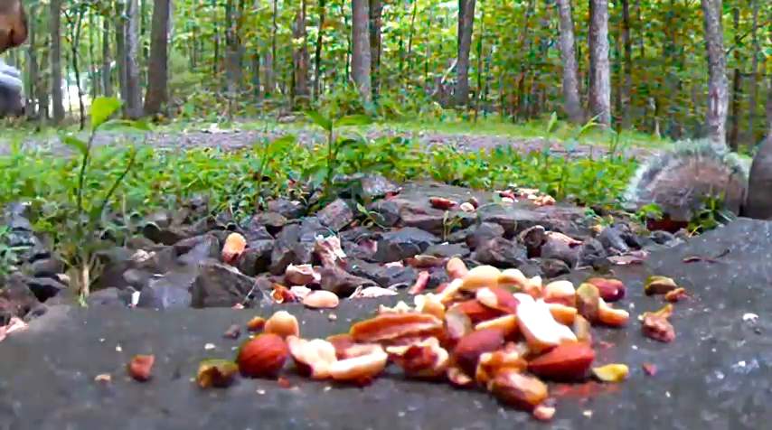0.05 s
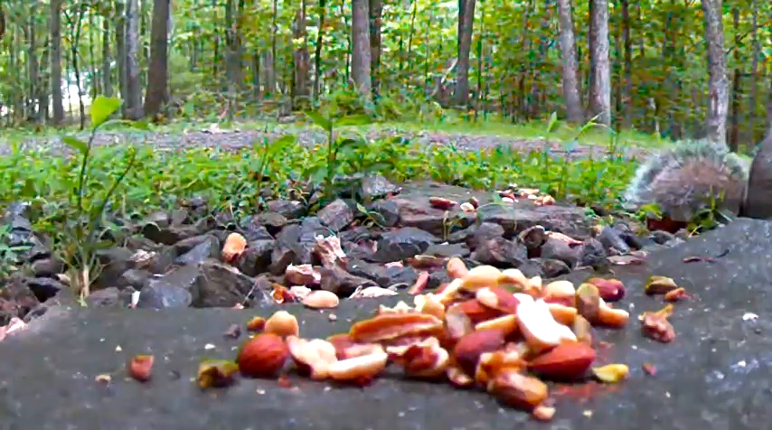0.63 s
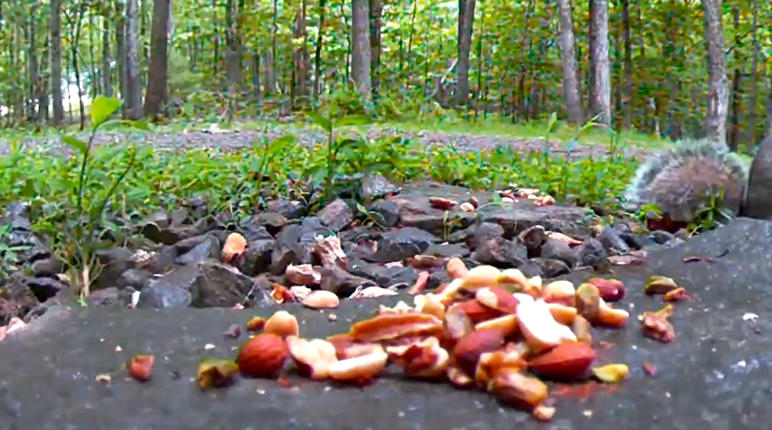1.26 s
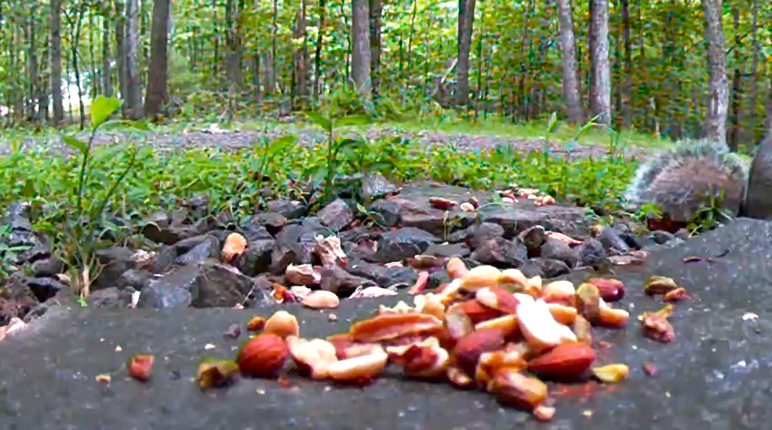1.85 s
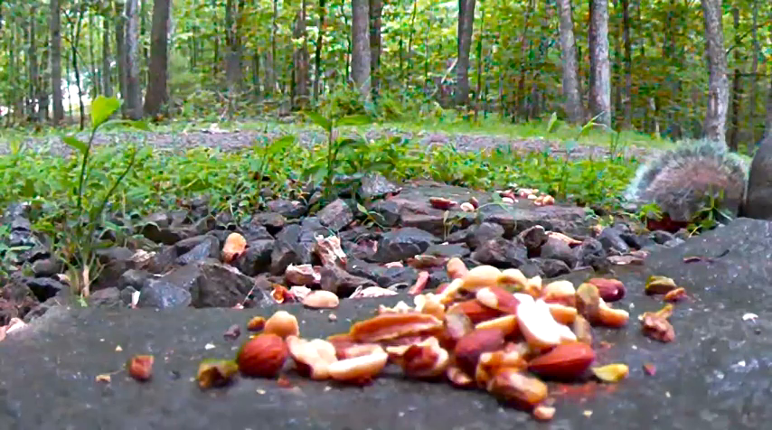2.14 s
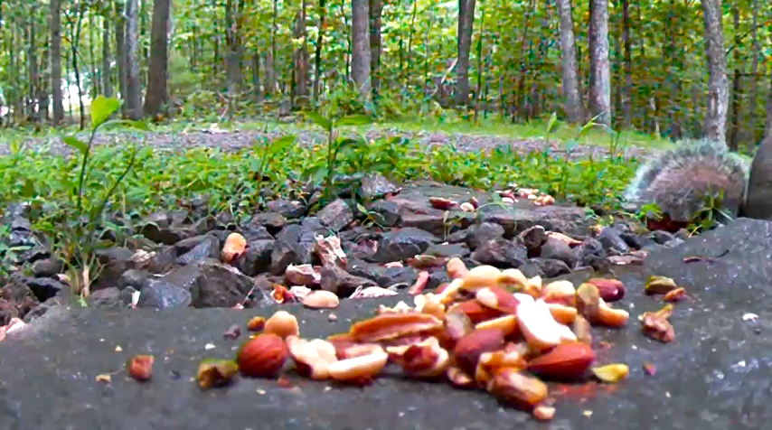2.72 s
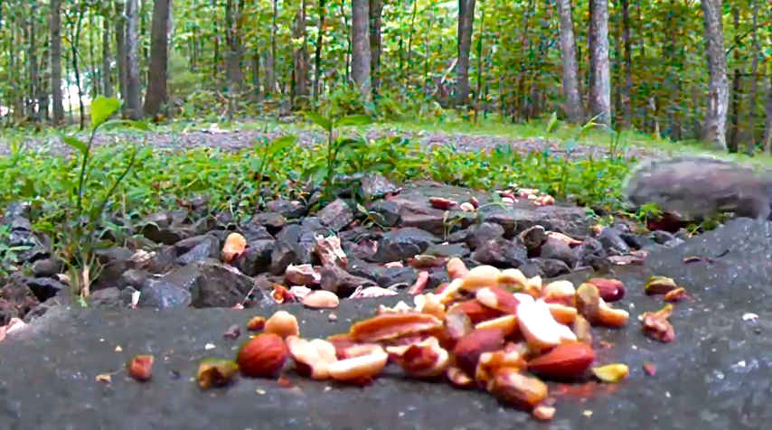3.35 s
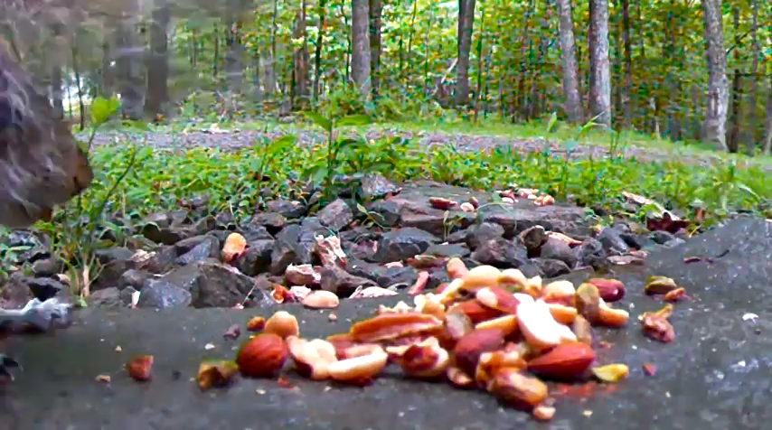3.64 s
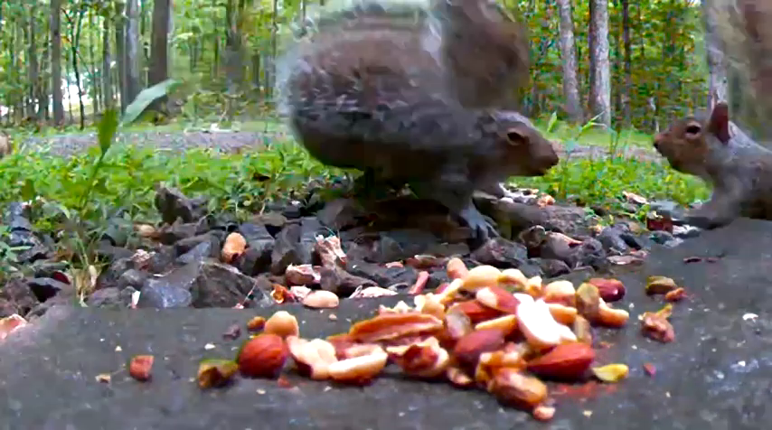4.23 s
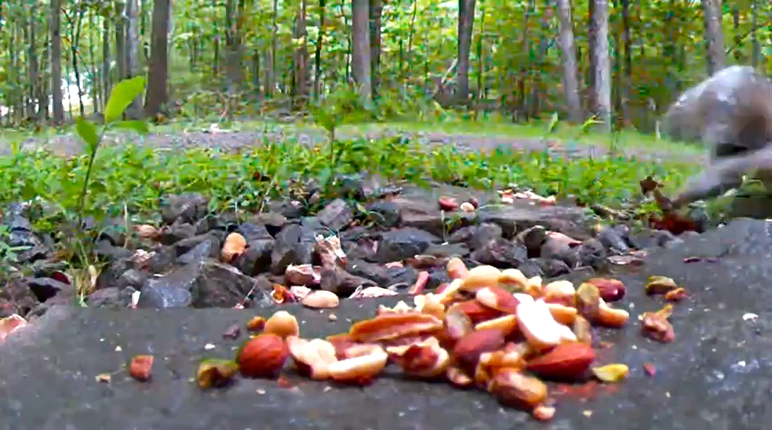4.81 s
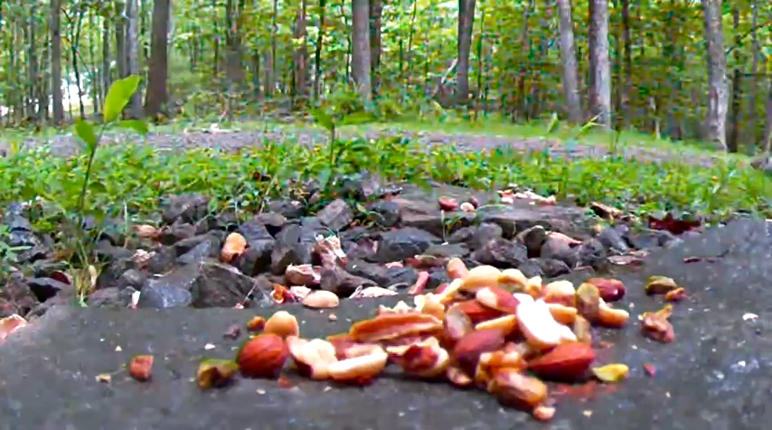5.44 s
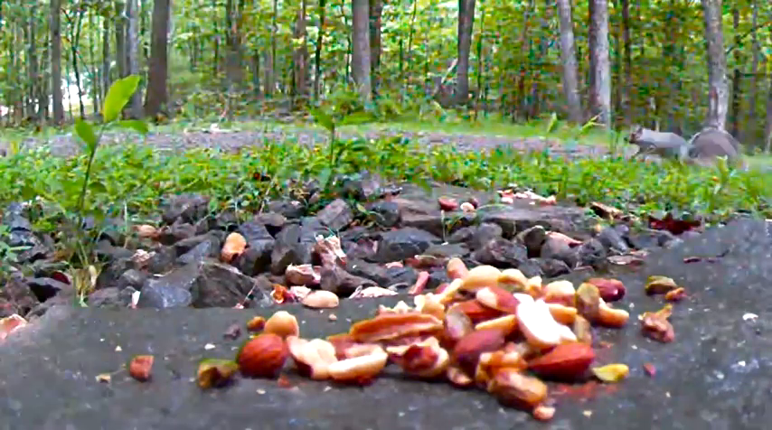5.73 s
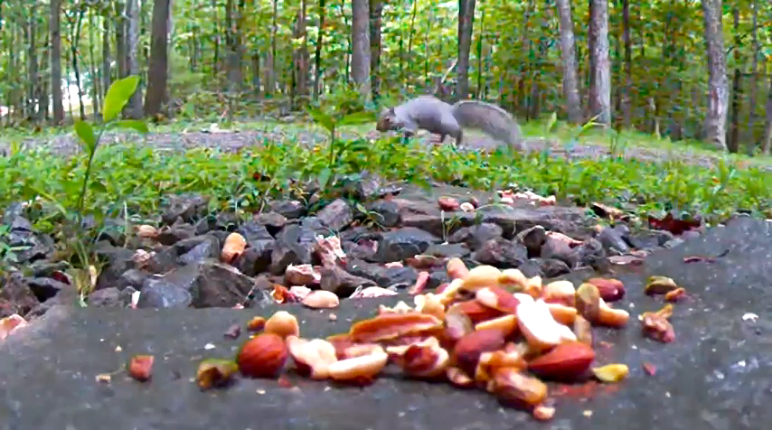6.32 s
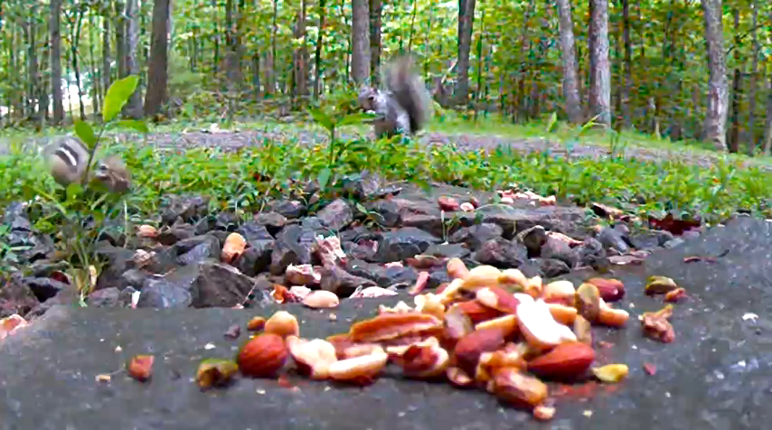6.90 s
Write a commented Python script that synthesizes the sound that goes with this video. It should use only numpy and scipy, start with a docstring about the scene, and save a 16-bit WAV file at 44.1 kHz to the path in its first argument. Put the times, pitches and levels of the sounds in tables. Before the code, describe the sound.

In a quiet wood with barely audible insects, birds and a far engine drone, a squirrel nibbles nuts on a rock right beside the microphone. Crisp little snaps mix with brief raspy whines and tiny squeaks. About halfway through comes a louder two-second scramble of claw clicks, crackling leaves and soft, low paw thuds, which trails off into a few faint ticks.

```python
"""Sharp little cracks and scrapes over quiet forest air: a squirrel is opening peanuts on a flat rock.
Its incisors snap the nuts and stick and slip on the kernels; between bites it whines and hisses at a rival.
Then it dashes off: claws click on loose stones, dry leaves rustle, paws thump the rock and set it ringing.
Behind it are a far engine hum, a thin band of insects and a few faint bird notes smeared by the trees.
All is heard through the housing of a small camera right beside the rock."""
import sys
import numpy as np
from scipy import signal
from scipy.fft import rfft, irfft, next_fast_len
from scipy.io import wavfile
from scipy.ndimage import uniform_filter1d

SR = 44100
rng = np.random.default_rng(int(sys.argv[2]) if len(sys.argv) > 2 else 0)


def materialize(psi):
    """Save the field psi as 16-bit PCM at rate SR to the path in sys.argv[1].

    A 1-D psi becomes a single channel; in a 2-D psi each row is a channel.
    """
    bounded = np.clip(np.atleast_2d(psi).T, -1, 1)
    quanta = np.round(bounded * 32767).astype(np.int16)
    wavfile.write(sys.argv[1], SR, quanta)


N = 307377
TIME = np.arange(N) / SR


def gain_of(db):
    """Decibels to amplitude."""
    return 10 ** (np.asarray(db) / 20)


def unit_rms(x):
    """Scales to rms 1."""
    return x / np.sqrt(np.mean(x ** 2) + 1e-20)


def eq_gain(curve, hz):
    """Amplitude of an EQ curve at hz, read on a log-frequency axis."""
    points_hz, db = np.transpose(curve)
    return gain_of(np.interp(np.log(hz + 1), np.log(points_hz + 1), db))


def eq(x, curve):
    """Filters x by a curve of (frequency [Hz], gain [dB])."""
    size = next_fast_len(len(x) + 2048)
    return irfft(rfft(x, size) * eq_gain(curve, np.fft.rfftfreq(size, 1 / SR)), size)[:len(x)]


def noise(curve):
    """Scene-long noise of rms 1, coloured by an EQ curve."""
    return unit_rms(eq(rng.standard_normal(N), curve))


def automation(rows):
    """Draws each column of timed breakpoints as a scene-long curve."""
    times, *columns = np.transpose(rows)
    return [np.interp(TIME, times, column) for column in columns]


def add(mix, start_s, sound):
    """Mixes a sound in at start_s."""
    part = mix[max(round(start_s * SR), 0):][:len(sound)]
    part += sound[:len(part)]


def wander(count, rate_hz):
    """Smooth random drift, roughly of size 1."""
    knots = np.arange(count) * rate_hz / SR
    return np.interp(knots, np.arange(4096), rng.standard_normal(4096))


def whistles(rows, blur, blur_hz):
    """Thin gliding notes that waver in strength and phase."""
    out = np.zeros(N)
    for start, length, start_hz, end_hz, db in rows:
        count = int(length * SR)
        phase = 2 * np.pi * np.cumsum(np.linspace(start_hz, end_hz, count)) / SR
        waver = wander(count, blur_hz) * np.sin(phase) + wander(count, blur_hz) * np.cos(phase)
        note = unit_rms(np.sin(phase) + blur * waver)
        add(out, start, gain_of(db) * note * signal.windows.tukey(count, .4))
    return out


def snap(hz, octaves, splinter_ms, low_cut_hz=1500, skirt=1.52, size=1024):
    """A brittle break and its tiny after-cracks ring a small, well damped body; energy 1."""
    t = np.arange(size) / SR
    freqs = np.fft.rfftfreq(size, 1 / SR) + 1
    splinters = rng.standard_normal(size) * np.exp(-t * 1e3 / max(splinter_ms, .05))
    force = 2 * splinter_ms * splinters / np.linalg.norm(splinters)
    force[0] += 1  # the break itself
    detune = np.log2(freqs / hz) / max(octaves, .1)
    log_body = -skirt * np.log(1 + detune ** 2 / skirt) - .5 * np.log(1 + (low_cut_hz / freqs) ** 4)
    cepstrum = irfft(np.maximum(log_body, log_body.max() - np.log(1000)))
    cepstrum[1:size // 2] *= 2  # minimum phase: the ring follows the break
    cepstrum[size // 2 + 1:] = 0
    ring = irfft(rfft(force) * np.exp(rfft(cepstrum)))
    return ring / np.linalg.norm(ring)


def cracks(rows, trim_db, window_s=0.0021):
    """Single brittle breaks, each with its energy set as an rms level over window_s."""
    out = np.zeros(N)
    for start, db, hz, octaves, splinter_ms in rows:
        gain = gain_of(db + trim_db) * np.sqrt(window_s * SR)
        add(out, start - .0002, gain * snap(hz, octaves, splinter_ms))
    return out


def ticks(stir, start_s, end_s, per_s, above_stir_db, centre_hz, spread_db=3, spread_octaves=0.47):
    """Light touches at uneven intervals, each riding the stirring of the ground at that moment."""
    out = np.zeros(N)
    for k, (late, accent, pitch) in enumerate(rng.uniform(-1.3, 1, (160, 3))):
        at = start_s + (k + 1 + late) / per_s
        tick = snap(centre_hz * 2 ** (spread_octaves * pitch), octaves=0.45, splinter_ms=0.14)
        if at < end_s:
            add(out, at, gain_of(above_stir_db + spread_db * accent) * np.interp(at, TIME, stir) * tick)
    return out


def stone_echo(x, rock_db=-10, rock_decay_s=0.005, stones_db=-22, stones_decay_s=0.012):
    """The rock scatters a very short echo, the loose stones around it a fainter, longer one."""
    t = np.arange(SR // 16) / SR
    echo = np.zeros(len(t))
    for db, decay_s in (rock_db, rock_decay_s), (stones_db, stones_decay_s):
        scatter = rng.standard_normal(len(t)) * np.exp(-t / decay_s) * (t > .0008)
        echo += gain_of(db) * scatter / np.linalg.norm(scatter)
    return x + signal.oaconvolve(x, echo)[:N]


# Tone of the forest air: (frequency [Hz], gain [dB])
AIR_EQ = [(12, -51.5), (22, -8.5), (60, -5.5), (90, -4.5), (130, -13), (200, -8), (300, -13.5), (630, -18),
          (1580, -20.5), (2100, -19), (2920, -18.5), (3700, -17.5), (7400, -24), (9000, -38.5),
          (11700, -100)]


def forest_air(level_db=-65.5, waver_db=1.3):
    """A soft, dark bed of still air whose level wavers slightly."""
    return gain_of(level_db + waver_db * wander(N, 13)) * noise(AIR_EQ)


# Partials of the far engine: (frequency [Hz], base level [dB], swell depth [ratio])
HUM_PARTIALS = [(75.4, -79, 0.6), (129.3, -73, 1.1), (240, -82, -0.25), (301, -87, 0.7)]
# Its slow swell, scaled by each partial's depth: (time [s], gain [dB])
HUM_RIDE = [(0, -9), (2.5, -4), (5.4, 4), (6.3, 2.5), (6.97, -2.5)]


def engine_hum(drift_hz=12):
    """A far engine drones on low partials, each drifting in strength and phase."""
    swell_db, = automation(HUM_RIDE)
    out = np.zeros(N)
    for hz, db, depth in HUM_PARTIALS:
        waver = 1 + 0.42 * wander(N, drift_hz)
        tone = np.sin(2 * np.pi * hz * TIME + wander(N, drift_hz))
        out += gain_of(db + depth * swell_db) * unit_rms(waver * tone)
    return out


def insects(hz=3010, level_db=-75, waver_db=1.0):
    """Insects blend into one thin, gently wavering band of noise."""
    band = [(hz * .8, -40), (hz * .92, -6), (hz, 0), (hz * 1.1, -6), (hz * 1.4, -40)]
    return gain_of(level_db + waver_db * wander(N, 4)) * noise(band)


# Far bird notes: (time [s], length [s], start pitch [Hz], end pitch [Hz], level [dB])
BIRD_NOTES = [(2.6, 0.46, 2920, 3000, -72), (3.08, 0.11, 2990, 2936, -63), (3.2, 0.055, 2990, 2980, -67),
              (3.25, 0.13, 2260, 2300, -73), (5.49, 0.081, 2425, 2410, -67), (5.58, 0.19, 2284, 2330, -72),
              (5.6, 0.19, 2610, 2580, -64), (5.72, 0.14, 3130, 3020, -71), (5.84, 0.086, 2910, 2860, -69),
              (6.38, 0.14, 2880, 2890, -76.5)]


def birds(wet=0.66, t60_s=0.89):
    """Faint whistled calls, smeared into a short tail by trunks and leaves."""
    calls = whistles(BIRD_NOTES, blur=1.1, blur_hz=130)
    t = np.arange(SR // 2) / SR
    tail = rng.standard_normal(len(t)) * gain_of(-60 * t / t60_s)
    reverb = signal.oaconvolve(calls, tail / np.linalg.norm(tail))[:N]
    return (calls + wet * reverb) / np.sqrt(1 + wet ** 2)


# Ground bed, swelling as the animal runs up, dulling as it leaves:
# (time [s], level [dB], brightness [relative])
STIR_RIDE = [(0, -68.5, -1), (2.2, -68, 0), (3.33, -68.5, -2), (3.41, -58.5, -3), (3.5, -49.5, 1),
             (4.02, -53, 4), (4.15, -44, 4), (4.34, -48, 3), (4.55, -53, 5), (4.7, -50, 2.5),
             (4.9, -50.5, -0.5), (5.09, -46, -1), (5.3, -54.5, 3), (5.55, -63, -3), (6.1, -67.5, -6),
             (6.97, -69.5, -7)]
# Paw sweeps through husks, grit or leaves: (time [s], length [s], level [dB], brightness [relative])
PAW_SCUFFS = [(0.33, 0.062, -63.5, 4), (0.911, 0.044, -62, -1), (0.987, 0.082, -65, 5),
              (1.787, 0.0072, -57.5, 0), (2.503, 0.11, -62, 0), (3.063, 0.0092, -53, 1),
              (3.412, 0.013, -50.5, -7), (3.442, 0.013, -44, 3.5), (3.58, 0.039, -45, 1),
              (3.628, 0.085, -42.5, 1), (3.764, 0.05, -47, -0.5), (4.072, 0.013, -38.5, 10.5),
              (4.12, 0.022, -40.5, 7), (4.214, 0.052, -53.5, 10), (4.419, 0.0046, -35.5, -0.5),
              (4.442, 0.047, -43.5, 4), (4.569, 0.023, -46, -4), (4.629, 0.086, -48, 6.5),
              (4.875, 0.0053, -39.5, 0), (4.926, 0.023, -43.5, 0.5), (4.963, 0.053, -44.5, -4.5),
              (5.115, 0.035, -41.5, 3.5), (5.189, 0.04, -48.5, -5), (5.273, 0.025, -47, -4.5),
              (5.357, 0.061, -50.5, -2)]


def ground_stir(rise_s=0.0041, settle_s=0.015):
    """Amplitude and brightness curves: each scuff rises, holds and settles over the steady movement."""
    bed_db, bed_brightness = automation(STIR_RIDE)
    power = gain_of(bed_db) ** 2
    weighted_brightness = power * bed_brightness
    for start, length, db, brightness in PAW_SCUFFS:
        attack = np.clip((TIME - start) / rise_s + .5, 0, 1)
        release = np.exp(-np.clip((TIME - start - length) / settle_s, 0, 20))
        scuff_power = (gain_of(db) * attack * release) ** 2
        power += scuff_power
        weighted_brightness += scuff_power * brightness
    return np.sqrt(power), weighted_brightness / power


def leaf_grains(crispness, per_s=2200, spread_db=4.0, clump_db=5.5, pitch_count=24):
    """Grit and dry leaf break in tiny snaps; the crisper the ground, the more they clump."""
    hits = gain_of(spread_db * np.minimum(rng.exponential(1, N), 3.5)) * rng.choice([-1, 1], N)
    hits *= rng.random(N) < per_s / SR
    hits *= gain_of(clump_db * crispness ** 2 * np.minimum(wander(N, 90), 1.1))
    pitch_index = rng.integers(0, pitch_count, N)
    out = np.zeros(N)
    for k, hz in enumerate(np.geomspace(1500, 8000, pitch_count)):
        # higher grains cover more bandwidth, so they carry more energy
        grain = np.sqrt(hz) * snap(hz, octaves=0.81, splinter_ms=0.45, low_cut_hz=497)
        out += signal.oaconvolve(hits * (pitch_index == k), grain)[:N]
    return unit_rms(out)


def touch_resonances(x, depth_db=2.0, frame=256):
    """Each stone and leaf that is touched rings at pitches of its own for a moment."""
    spectra = signal.stft(x, nperseg=frame)[2]
    patches = uniform_filter1d(rng.standard_normal(spectra.shape), size=3, axis=0)  # across pitch
    patches = uniform_filter1d(patches, size=7, axis=1)  # across time
    return signal.istft(spectra * gain_of(depth_db * unit_rms(patches)), nperseg=frame)[1][:N]


# Tone of the rustle: (frequency [Hz], gain [dB])
RUSTLE_EQ = [(250, -32.5), (450, -21.5), (700, -14.5), (1200, -13), (1730, -11.5), (2160, -0.5), (2450, -7),
             (3000, -3), (4400, -2), (5200, -4), (6200, -11), (7700, -13), (8400, -20), (9000, -40)]


def rustle(stir, brightness, fur_gain=0.76, trim_db=-0.1, hollow_db=-5.0, hollow_swing_db=2.5):
    """Leaf and grit crackle over the soft brushing of fur; some touches sound hollower than others."""
    # as the animal runs off, the clumped snaps give way to a more even swish
    crispness = np.interp(TIME, [3.45, 3.8, 4.7, 5.2], [0.87, 0.8, 0.99, 0.66])
    texture = crispness * leaf_grains(crispness) + fur_gain * rng.standard_normal(N)
    texture = unit_rms(eq(touch_resonances(texture), RUSTLE_EQ))
    hollow = eq(texture, [(1700, -41.5), (1950, -12.5), (2160, 0), (2300, 1.5), (2500, -37.0)])
    texture += (gain_of(hollow_db + hollow_swing_db * wander(N, 60)) - 1) * hollow
    treble = eq(texture, [(3000, -41.0), (3600, -11), (4400, 2.0), (5200, 7.5)])
    lift = gain_of(0.29 * brightness)
    tilted = (texture + (lift - 1) * treble) / np.sqrt((1 + lift ** 2) / 2)
    return gain_of(trim_db) * stir * tilted


# Low body of the rock under light steps: (frequency [Hz], gain [dB])
ROCK_EQ = [(40, -26.5), (58, -34), (78, 4.5), (105, -6), (140, -1), (200, -10.5), (300, -25), (500, -35),
           (1000, -56.5)]


def paw_patter(stir, level_db=-58, usual_stir_db=-46, lag_s=0.0097):
    """Light steps rumble in the rock just after each scuff."""
    weight = np.interp(TIME - lag_s, TIME, stir / gain_of(usual_stir_db)) ** 0.48
    on_rock = np.interp(TIME, [3.42, 3.62, 5.18, 5.3, 5.5], [0.1, 1.0, 0.99, 0.6, 0.27])
    return gain_of(level_db) * weight * on_rock * noise(ROCK_EQ)


# Paws landing on the rock: (time [s], thud level [dB], mid-glide pitch [Hz], ring level [dB])
LANDINGS = [(3.637, -46.5, 128, -52), (3.71, -40, 116.6, -66), (3.91, -52.5, 125, -66),
            (4.177, -47, 110, -51), (4.31, -53.5, 111, -52.5), (4.459, -35, 125.6, -39.5),
            (4.655, -45, 137, -56), (4.68, -40, 105, -52), (4.718, -38, 130, -49.5),
            (4.952, -50.5, 137, -66), (5.011, -57, 110, -52), (5.075, -58, 109, -58),
            (5.135, -45.5, 128, -65), (5.212, -56, 118, -57)]


def paw_thumps(thud_decay_s=0.013, sag=0.31, sag_s=0.024, rock_hz=79, ring_decay_s=0.051):
    """Each soft landing thuds with a falling pitch and sets the rock's low note ringing."""
    out = np.zeros(N)
    t = np.arange(SR // 3) / SR
    thud = (1 - np.exp(-t / 0.008)) * np.exp(-t / thud_decay_s)
    ring = (1 - np.exp(-t / 0.014)) * np.exp(-t / ring_decay_s)
    glide = 1 + sag * (2 * np.exp(-t / sag_s) - 1)
    for start, thud_db, hz, ring_db in LANDINGS:
        phase = 2 * np.pi * np.cumsum(hz * glide) / SR
        add(out, start, gain_of(thud_db) * thud / thud.max() * np.sin(phase))
        add(out, start, gain_of(ring_db) * ring / ring.max() * np.sin(2 * np.pi * rock_hz * t))
    return out


# Throat squeaks and hums: (time [s], length [s], start pitch [Hz], end pitch [Hz], level [dB])
SQUEAK_NOTES = [(2.192, 0.046, 910, 963, -67), (2.23, 0.027, 1030, 1090, -75),
                (2.355, 0.028, 730, 812, -69.5), (2.985, .033, 960, 1040, -72.5),
                (3.655, 0.088, 285, 300, -63)]


def squeaks():
    """The throat lets out brief, nearly pure rising notes."""
    return whistles(SQUEAK_NOTES, blur=0.18, blur_hz=80)


# Tone of the throat and of air rasping through it: (frequency [Hz], gain [dB])
THROAT_EQ = [(150, -21), (250, 6.5), (350, 0.5), (500, -2), (700, 4.5), (850, -2), (1030, -2.5),
             (1300, -16), (2000, -47), (4000, -63)]
RASP_EQ = [(200, -23), (400, -32), (560, -2), (830, 7), (1000, 1), (1200, -22), (1600, -21), (4000, -70)]
# Tone of the hiss as heard through the camera housing: (frequency [Hz], gain [dB])
HISS_EQ = [(900, -58), (1700, -17), (2200, -11.5), (2450, -13), (2850, 0.5), (3100, 1), (3400, -4.5),
           (3750, 0.5), (4250, -2.5), (4750, 5), (5050, 1), (5420, -9), (5850, 0), (6250, -8), (6550, -5.5),
           (7150, -14), (7600, -9.5), (8030, -31), (8300, -16), (9000, -32)]
# Whine syllables: (time [s], length [s], top pitch [Hz], voice [dB], hiss [dB], roughness [0-1])
SYLLABLES = [(1.222, 0.14, 342, -57.5, -54, 0.24), (1.319, 0.1, 282, -61.5, -54, 0.33),
             (1.405, 0.15, 255.7, -63.5, -60.5, 0.36), (2.06, 0.062, 268, -61.5, -52, 0.37),
             (2.11, 0.11, 251, -65, -61.5, 0.47), (2.695, 0.068, 274.4, -59, -55.5, 0.34),
             (2.752, 0.0823, 308.6, -60.5, -54, 0.35), (2.843, 0.087, 246, -70.5, -58.5, 0.5),
             (2.94, 0.067, 256, -64.5, -61.5, 0.38)]


def whines(rest_hz=228.6, peak_share=0.515, jitter=0.12, fade_s=0.0058, ends_db=-6):
    """An unsteady throat tone, with rasp and hiss fluttering on each cycle, rides an arch of effort."""
    out = np.zeros(N)
    for start, length, top_hz, voice_db, hiss_db, rough in SYLLABLES:
        t = np.arange(0, length, 1 / SR)
        count = len(t)
        effort = np.sin(np.pi * np.interp(t / length, [0, peak_share, 1], [0, .5, 1]))
        hz = rest_hz + (top_hz - rest_hz) * effort ** 1.377
        phase = 2 * np.pi * np.cumsum(hz * (1 + jitter * rough * wander(count, 298))) / SR
        tone = np.zeros(count)
        for k in range(1, 8):
            smear = (k - 1) * rough * wander(count, 218)  # uneven cycles blur the upper partials most
            tone += eq_gain(THROAT_EQ, k * hz) * np.sin(k * phase + smear)
        flutter = 1 + 0.55 * np.cos(phase)
        rasp = unit_rms(eq(flutter * rng.standard_normal(count), RASP_EQ))
        sputter = gain_of(2.1 * wander(count, 247))
        hiss = unit_rms(eq(flutter * sputter * rng.standard_normal(count), HISS_EQ))
        voice = unit_rms((1 - rough) * unit_rms(tone) + 1.23 * rough * rasp)
        envelope = np.minimum(np.minimum(t, length - t) / fade_s, 1) * gain_of(ends_db * (1 - effort))
        add(out, start, envelope * (gain_of(voice_db) * voice + gain_of(hiss_db) * hiss))
    return out


# Scrapes on the nut between cracks: (time [s], length [s], nut pitch [Hz], level [dB])
SCRAPES = [(0.274, 0.016, 3100, -61), (0.494, 0.0029, 3130, -57), (0.51, 0.017, 3230, -58.5),
           (0.651, 0.013, 3120, -67), (0.753, 0.008, 3100, -62), (0.768, 0.0065, 2950, -59),
           (0.923, 0.025, 4220, -59), (1.011, 0.014, 3660, -60.5), (1.041, 0.032, 3300, -60.5),
           (2.635, 0.027, 3050, -62.5), (3.0645, 0.012, 3180, -53)]


def gnawing(slips_per_s=1100, width_octaves=0.19, shift_octaves=0.082, spots=6):
    """The incisors stick and slip unevenly; each slip rings the kernel at a slightly different pitch."""
    out = np.zeros(N)
    for start, length, hz, db in SCRAPES:
        count = int(length * SR)
        travel = np.cumsum(slips_per_s * np.exp(0.78 * wander(count, 900))) / SR
        slips = np.diff(np.floor(travel), prepend=-1) * rng.uniform(0.44, 1, count)
        spot = rng.integers(0, spots, count)
        pitches = hz * 2 ** (shift_octaves * np.linspace(-1, 1, spots))
        rings = [snap(pitch, width_octaves, splinter_ms=0) for pitch in pitches]
        scrape = sum(np.convolve(slips * (spot == k), ring) for k, ring in enumerate(rings))
        add(out, start, gain_of(db) * np.sqrt(count) * scrape / np.linalg.norm(scrape))
    return out


# Nut cracks: (time [s], level before EQ [dB], centre [Hz], width [octaves], splintering [ms])
NUT_CRACKS = [(0.293, -38, 3360, 0.25, 0.23), (0.3081, -44.5, 4060, 1, 0.81),
              (0.3092, -41.5, 3600, 0.12, 0.1), (0.5293, -42.5, 4130, 0.43, 0.11),
              (0.7191, -40.5, 4340, 0.45, 0.21), (0.7202, -47, 3530, 0.089, 0.1),
              (0.782, -47, 4300, 0.98, 0.084), (0.7925, -51.5, 3600, 0.53, 0.095),
              (1.3266, -50, 4600, 0.27, 0.2), (1.353, -45, 4300, 0.21, 0.27), (1.366, -53, 4500, 0.26, 0.2),
              (1.4985, -45.5, 4270, 0.41, 0.28), (1.5008, -37.5, 4260, 0.29, 0.67),
              (1.533, -46.5, 5000, 0.38, 0.1), (1.7905, -48, 3500, 0.38, 0.55),
              (1.7984, -41.5, 3200, 0.23, 0.56), (1.799, -43, 5130, 0.16, 0.67),
              (1.8035, -53, 4000, 0.3, 0.3), (1.8068, -52, 3500, 0.3, 0.2),
              (1.9103, -53.5, 3340, 0.39, 0.195), (2.0734, -49, 4580, 0.25, 0.1),
              (2.436, -55.5, 2970, 0.26, 0.1), (2.5455, -52, 3600, 0.24, 0.79),
              (2.6437, -48.5, 4230, 0.7, 0.81), (2.7279, -49, 3600, 0.63, 0.1),
              (2.9823, -51.5, 4140, 0.41, 0.2), (3.0254, -53, 3120, 0.4, 0.15),
              (3.067, -44, 3280, 0.36, 0.49), (3.076, -44, 4300, 0.52, 0.2), (3.084, -30, 3470, 0.37, 1),
              (3.0948, -33.5, 3470, 0.45, 0.11), (3.1172, -51, 4860, 0.37, 0.9)]
# Woody ring of the kernel, with a thin tick on top: (frequency [Hz], gain [dB])
KERNEL_EQ = [(1500, 8), (2300, 1), (3400, 1.5), (4900, -1), (5700, -6), (6400, -4), (7400, 5.5),
             (8600, -3.5)]


def nut_cracking(stir):
    """Incisors crack and gnaw the nut, ringing the kernel held between them, amid light ticks."""
    bites = eq(cracks(NUT_CRACKS, trim_db=-0.5), KERNEL_EQ)
    return bites + gnawing() + ticks(stir, 0.4, 3.3, per_s=7, above_stir_db=27, centre_hz=3600)


# Claw hits: (time [s], level before EQ [dB], centre [Hz], width [octaves], splintering [ms])
CLAW_HITS = [(3.4386, -47, 3600, 0.66, 0.4), (3.4579, -43, 4200, 0.45, 0.3), (3.482, -52, 4000, 0.56, 0.2),
             (3.508, -48, 4160, 0.46, 0.44), (3.5307, -45.5, 2176, 0.77, 0.44),
             (3.5534, -42, 3990, 0.44, 0.11), (3.5637, -39, 4000, 0.25, 0.5),
             (3.5816, -30, 4330, 0.33, 0.18), (3.5955, -42, 3200, 0.85, 0.34),
             (3.6175, -42, 5200, 0.6, 0.7), (3.631, -39, 4290, 0.3, 1), (3.6358, -37, 4600, 0.3, 0.5),
             (3.6403, -40, 4400, 0.4, 0.5), (3.643, -41, 2000, 0.57, 0.4), (3.6524, -32, 3400, 0.39, 0.4),
             (3.6664, -33.5, 4200, 0.22, 0.59), (3.673, -41, 4200, 0.24, 0.7),
             (3.7095, -35.5, 4230, 0.46, 0.8), (3.712, -36, 4400, 0.62, 0.77),
             (3.7197, -39, 3000, 0.37, 0.3), (3.769, -35, 3900, 0.39, 0.6), (3.7741, -35, 5800, 0.97, 0.9),
             (3.7797, -41, 5200, 0.78, 0.44), (3.8027, -41, 4400, 0.35, 0.6),
             (3.8192, -36.5, 4680, 0.31, 0.088), (3.8889, -42, 3870, 0.55, 0.56),
             (4.0534, -26.5, 4450, 0.49, 0.083), (4.0655, -38, 4250, 0.27, 0.23),
             (4.0762, -35, 4430, 0.25, 0.3), (4.0827, -31.5, 5100, 0.44, 0.3),
             (4.0874, -38, 4900, 0.37, 0.3), (4.0911, -39, 4800, 0.29, 0.3), (4.1157, -36, 4100, 0.4, 0.1),
             (4.1275, -40, 3800, 0.56, 0.3), (4.1335, -32, 4300, 0.41, 0.18),
             (4.1408, -34, 5400, 0.7, 0.87), (4.146, -32, 4430, 0.26, 0.2), (4.1534, -22, 4200, 0.43, 0.15),
             (4.1599, -24.5, 6160, 0.43, 0.49), (4.1829, -37.5, 3400, 0.44, 0.36),
             (4.2163, -31.5, 4580, 0.62, 0.12), (4.253, -46, 4300, 0.4, 0.2),
             (4.2645, -32, 3760, 0.25, 0.46), (4.2678, -26.5, 2970, 0.43, 0.35),
             (4.2698, -23.5, 3700, 0.39, 0.3), (4.2815, -35.5, 5520, 0.4, 0.063),
             (4.347, -25.5, 3850, 0.33, 0.085), (4.3895, -38, 3790, 0.98, 0.12),
             (4.398, -38, 4500, 0.45, 0.34), (4.4478, -38, 4500, 0.35, 0.15),
             (4.455, -38, 4500, 0.62, 0.15), (4.4148, -34, 3800, 0.33, 0.33),
             (4.4184, -32.5, 4260, 0.25, 0.11), (4.4653, -33.5, 3170, 0.54, 0.17),
             (4.4735, -39, 4370, 0.25, 0.103), (4.4948, -20, 4580, 0.45, 0.09),
             (4.4962, -25.5, 5000, 0.32, 0.62), (4.5195, -34.5, 3410, 0.53, 0.2),
             (4.5267, -37.5, 3220, 0.97, 0.087), (4.5642, -23, 3770, 0.43, 0.082),
             (4.6003, -27, 4430, 0.32, 0.1), (4.6339, -36, 4770, 0.4, 0.12),
             (4.6515, -41, 4200, 0.35, 0.29), (4.6604, -31.5, 4900, 0.27, 0.6),
             (4.6958, -44, 4200, 0.33, 0.3), (4.7325, -48, 4280, 0.44, 0.108), (4.787, -50, 5300, 0.2, 0.6),
             (4.7963, -26, 5200, 0.42, 0.25), (4.8027, -38, 5740, 0.26, 0.31),
             (4.8148, -51, 5670, 0.45, 0.112), (4.838, -39, 4550, 0.64, 0.13),
             (4.8487, -47, 4300, 0.37, 0.2), (4.8827, -34, 3600, 0.35, 0.089),
             (4.9233, -33.5, 3100, 0.41, 0.5), (4.925, -37.5, 3300, 0.54, 0.49),
             (4.9395, -37.5, 3390, 0.56, 0.7), (4.9798, -40, 4200, 0.4, 0.37),
             (4.9835, -43, 4450, 0.36, 0.54), (5.001, -39, 2500, 0.6, 0.2), (5.0061, -36, 4050, 0.26, 0.22),
             (5.046, -53, 4550, 0.295, 0.3), (5.1227, -43, 4300, 0.35, 0.256),
             (5.142, -44, 4000, 0.36, 0.46), (5.1812, -47, 3190, 0.5, 0.22), (5.1927, -41, 3780, 0.2, 0.1),
             (5.204, -43, 2640, 0.85, 0.12), (5.2734, -41.5, 4200, 0.31, 0.5),
             (5.281, -41.5, 4440, 0.16, 0.7), (5.3613, -45, 2860, 0.72, 1), (5.3671, -40, 3300, 0.54, 1),
             (5.3947, -54, 2600, 0.6, 0.69), (5.4807, -44.5, 2930, 0.52, 0.9),
             (5.728, -56, 4700, 0.43, 0.53), (5.812, -59, 4600, 0.35, 0.46), (6.166, -56, 4490, 0.45, 0.6)]
# Tone the loose stones give each hit: (frequency [Hz], gain [dB])
STONE_EQ = [(900, 14), (1500, 0), (2150, 3.5), (2800, -3), (4500, 1.5), (8000, -4)]


def claw_strikes(stir):
    """Claws click on stones and twigs through the dash, then trail off in faint ticks."""
    hits = eq(cracks(CLAW_HITS, trim_db=0.3), STONE_EQ)
    return hits + ticks(stir, 5.6, 6.3, per_s=38, above_stir_db=16, centre_hz=3390)


def scene():
    """The squirrel close up, the wood behind it, in mono."""
    voice = squeaks() + whines()
    far_birds = birds()
    stir, brightness = ground_stir()
    teeth = nut_cracking(stir)
    claws = claw_strikes(stir)
    clicks = stone_echo(teeth, rock_db=-6, rock_decay_s=0.0014) + stone_echo(claws)
    ground = rustle(stir, brightness) + paw_patter(stir) + paw_thumps()
    ambience = forest_air() + engine_hum() + insects() + far_birds
    return (ambience + ground + voice + clicks)[None]


def record(dry, cutoff_hz=8990):
    """The camera housing rings near 2.2 kHz, cancels just above and dulls the top; a low-pass follows."""
    housing_eq = [(1800, 0.91), (2200, 3), (2330, 1.5), (2440, -5),
                  (2650, 0.38), (2900, -0.9), (8100, -0.13), (9000, -14)]
    low_pass = signal.firwin(301, cutoff_hz, window=("kaiser", 8), fs=SR)
    return signal.oaconvolve(eq(dry[0], housing_eq), low_pass, "same")[None]


dry = scene()
out = record(dry)
materialize(out)
```